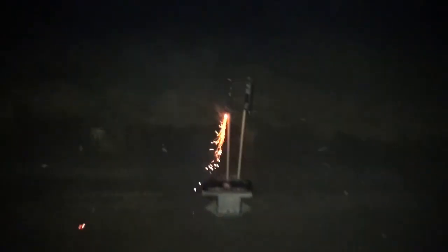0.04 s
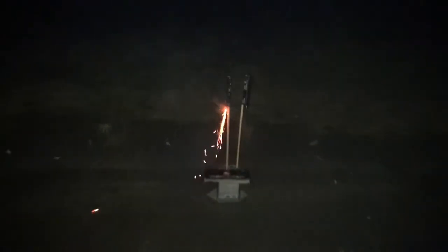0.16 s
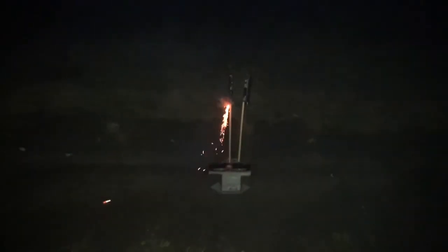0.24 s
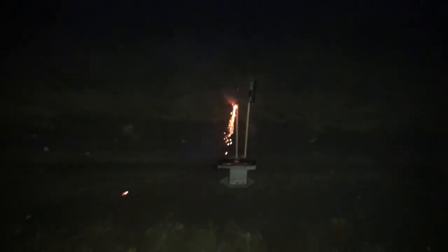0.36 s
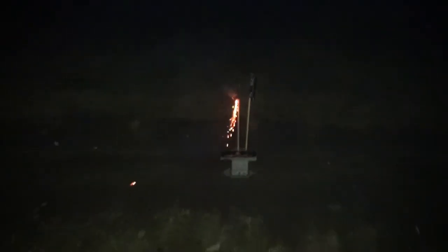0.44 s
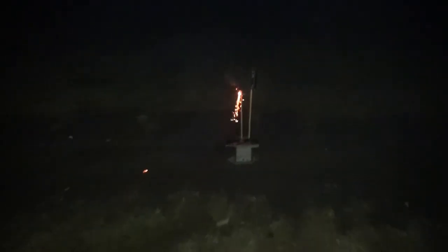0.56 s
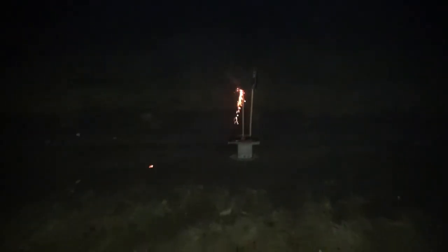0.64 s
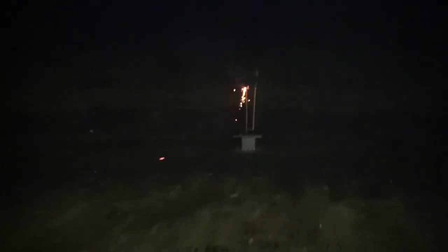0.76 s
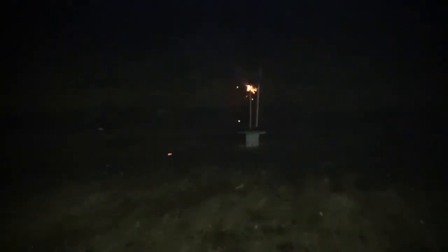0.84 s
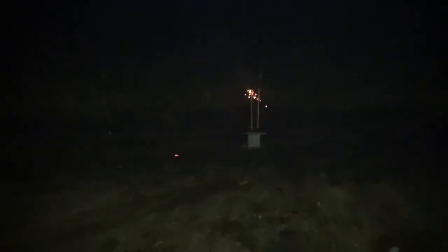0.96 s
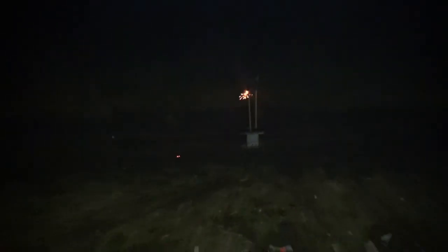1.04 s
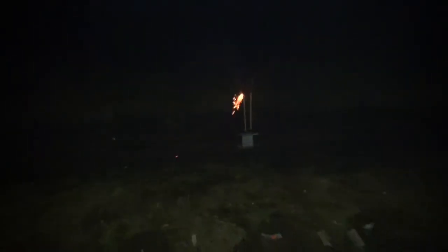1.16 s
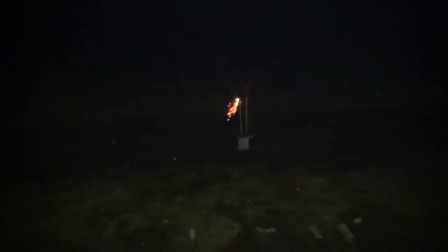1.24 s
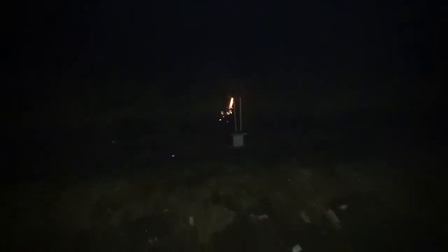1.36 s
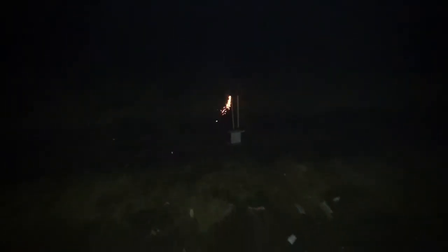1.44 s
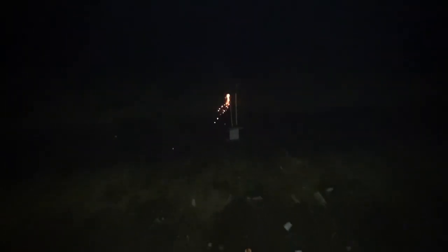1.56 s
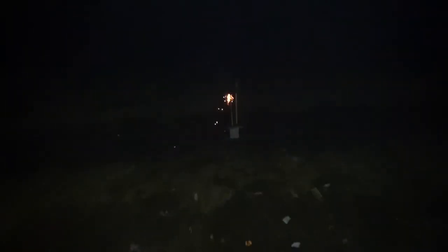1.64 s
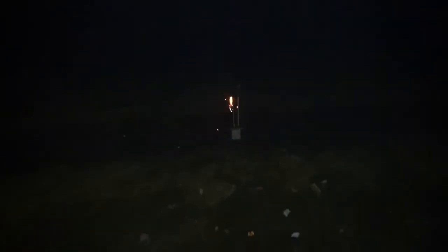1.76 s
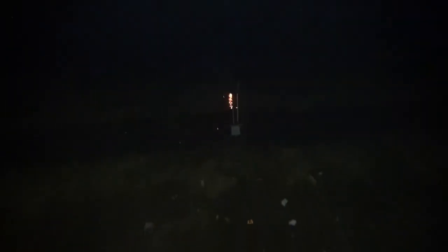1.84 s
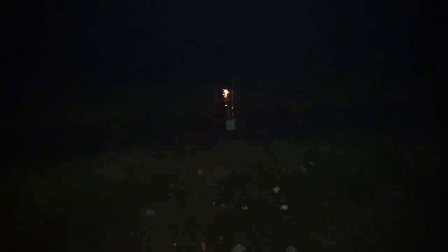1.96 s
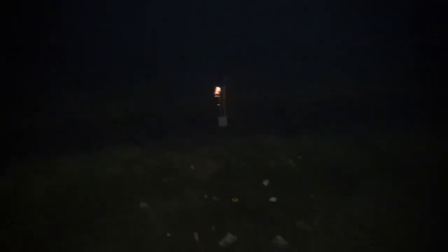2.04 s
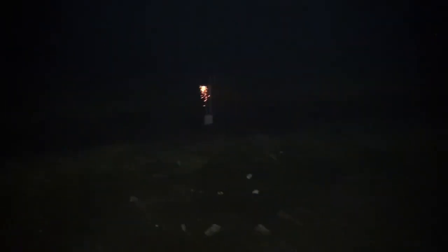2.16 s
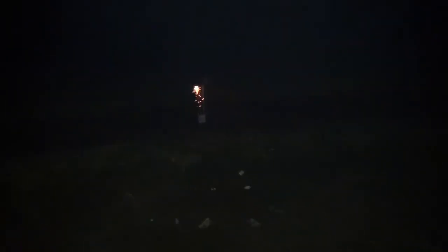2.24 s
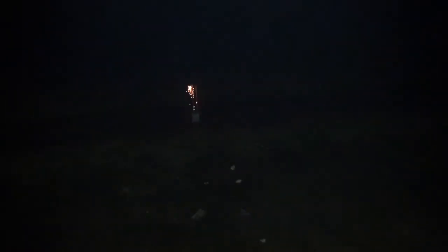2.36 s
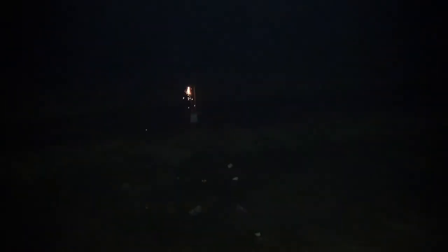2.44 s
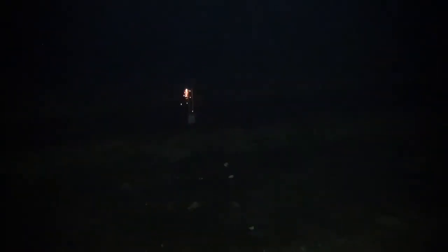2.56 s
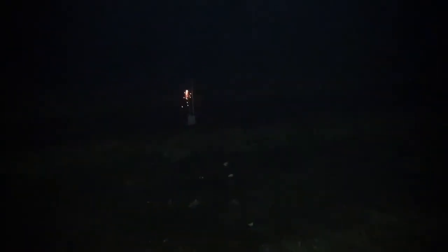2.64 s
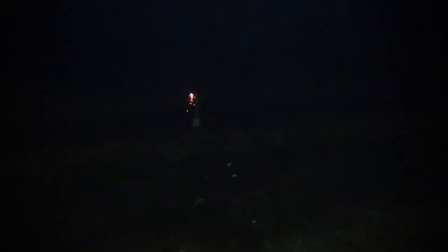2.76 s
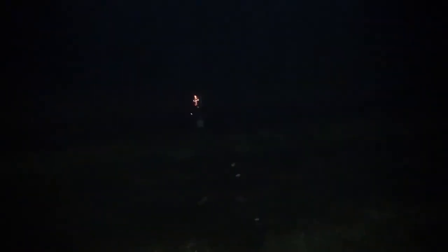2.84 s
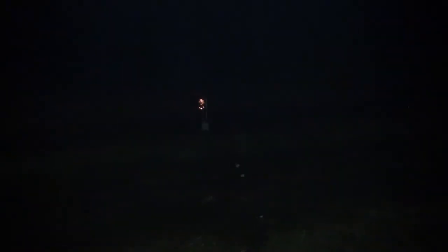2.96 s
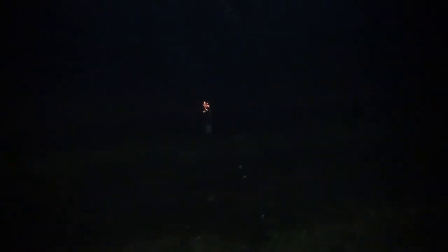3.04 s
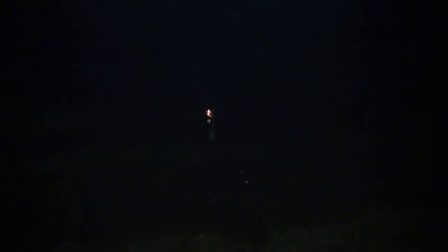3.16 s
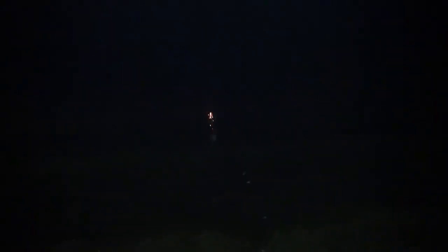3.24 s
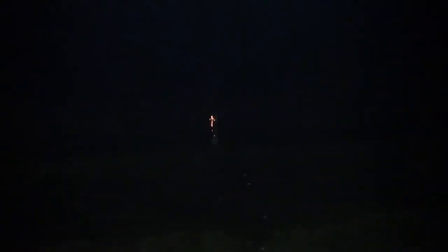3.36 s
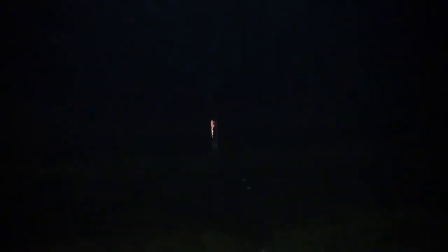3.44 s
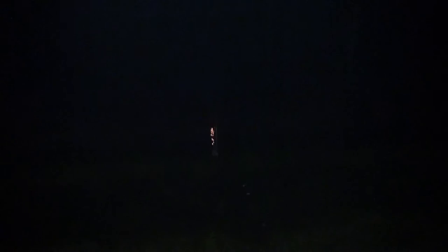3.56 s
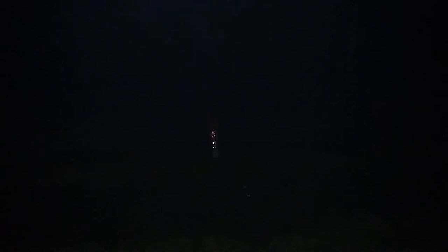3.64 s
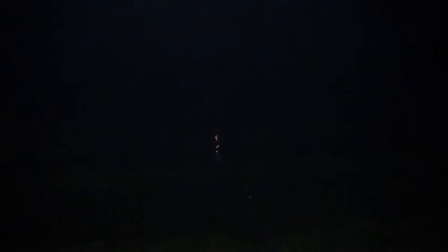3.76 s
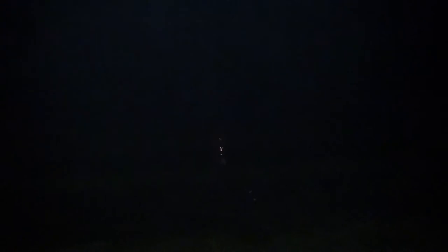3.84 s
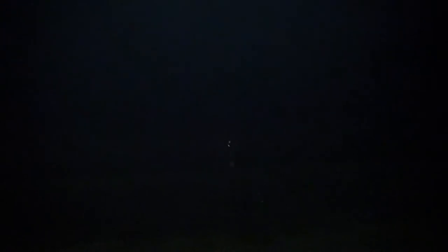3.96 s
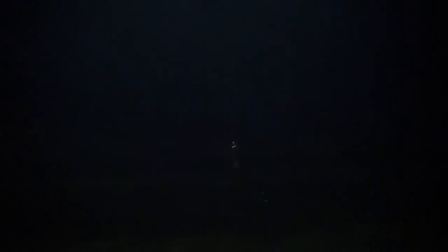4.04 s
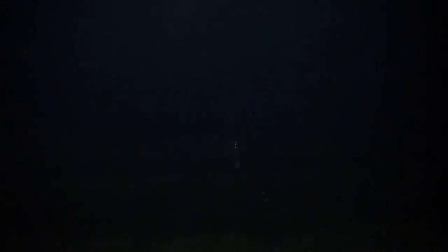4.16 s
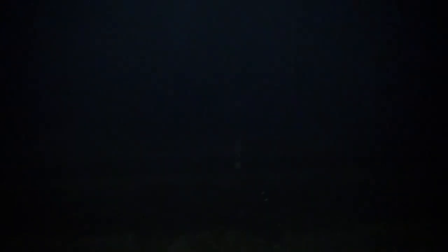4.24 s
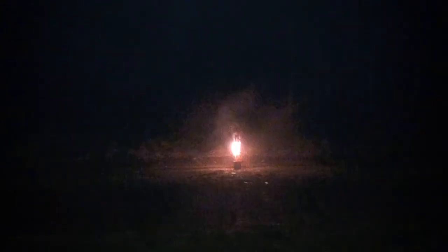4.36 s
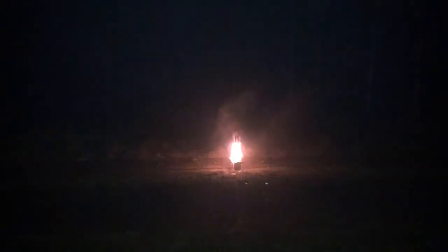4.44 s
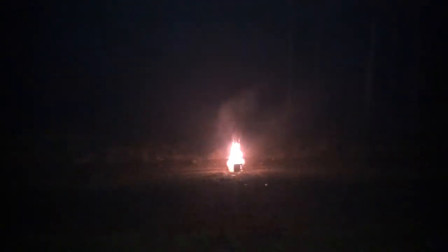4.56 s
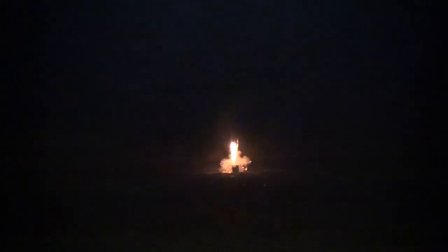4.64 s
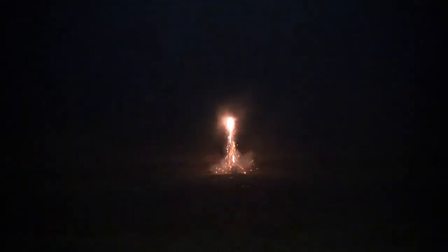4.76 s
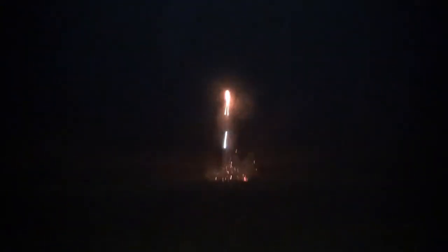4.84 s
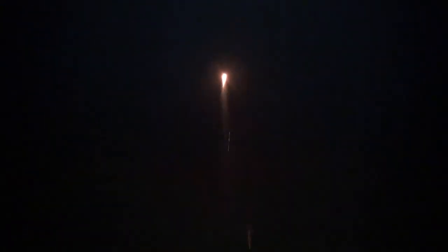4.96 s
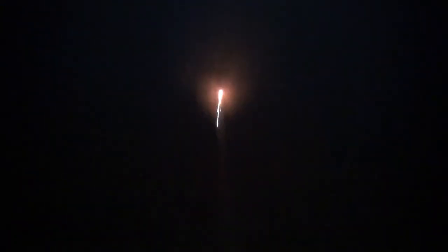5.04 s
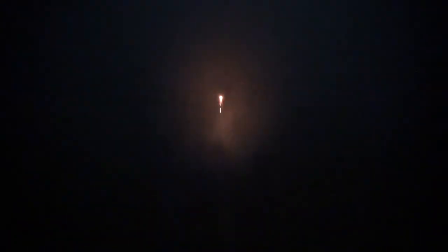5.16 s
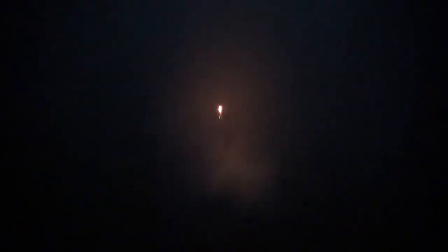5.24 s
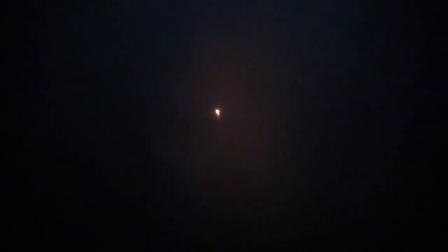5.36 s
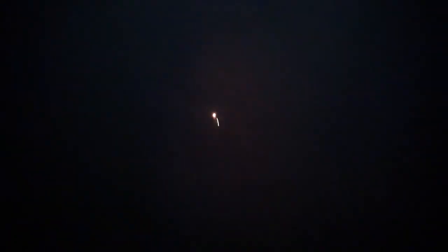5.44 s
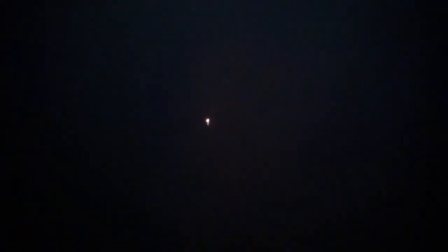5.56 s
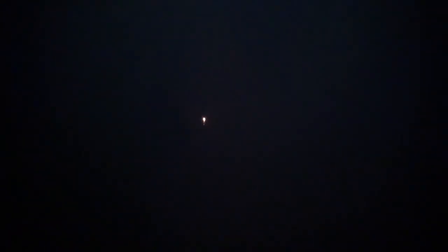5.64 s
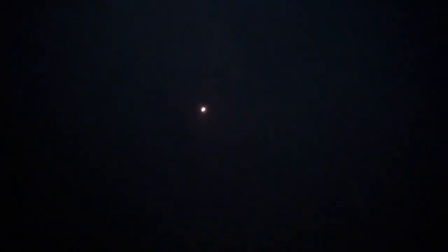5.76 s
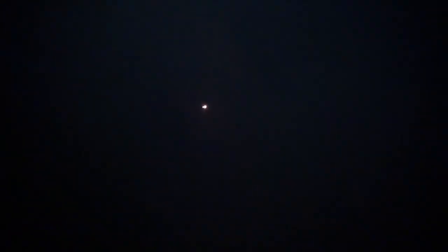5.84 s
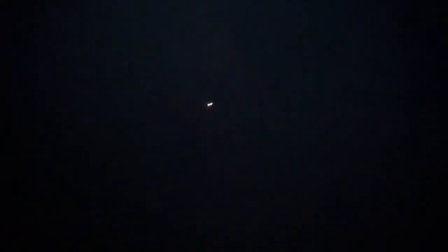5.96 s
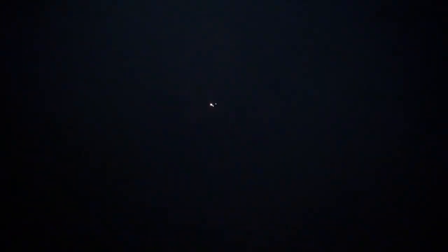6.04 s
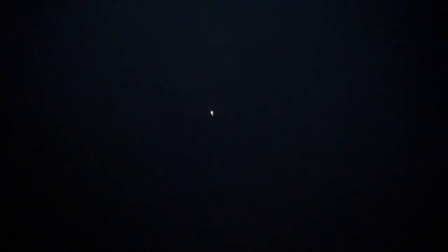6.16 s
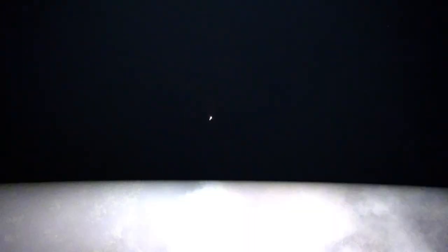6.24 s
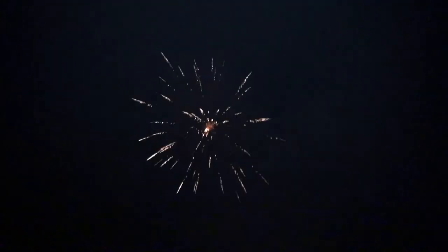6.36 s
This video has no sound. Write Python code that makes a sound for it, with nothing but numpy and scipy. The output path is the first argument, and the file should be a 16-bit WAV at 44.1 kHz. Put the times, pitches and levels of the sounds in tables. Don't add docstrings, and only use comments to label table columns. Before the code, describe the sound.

Open field at night, hand-held microphone. A fluttering fuse fizz grows fainter as the holder backs away with dull thuds, grass swish, cloth rub and wind buffeting. After a near-silent lull the motor hisses, then abruptly screams: a very loud, bright, buzzy whistle with rushing exhaust, sliding steadily lower and fading as it climbs, with diffuse echoes behind. No bang is heard.

```python
import sys
import numpy as np
from scipy import signal
from scipy.fft import rfft, irfft
from scipy.io import wavfile
from scipy.ndimage import map_coordinates

SR = 44100
rng = np.random.default_rng(int(sys.argv[2]) if len(sys.argv) > 2 else 0)


def to_wav(sig):
    pcm = np.clip(np.atleast_2d(sig), -1, 1) * 32767
    pcm = np.round(pcm).astype(np.int16)
    wavfile.write(sys.argv[1], SR, pcm.T)


def attenuation_scalar(level_db):
    decades = np.asarray(level_db, float) / 20
    return 10 ** decades


N = 282240
TIME = np.arange(N) / SR
PUFF_T = np.arange(8192) / SR
CATCH_S = 4.69

# [t/s, level/dB]
GROUND = [(.6, -14), (1.1, -3), (4.3, -7), (5.1, -5.5), (5.14, -13), (5.4, -16), (5.7, -30)]


def unit(x):
    return x / np.sqrt(np.mean(x ** 2) + 1e-20)


def along(points, hz):
    f, v = np.transpose(points)
    return np.interp(np.log(hz + 1), np.log(f + 1), v)


def curves(rows):
    s, *cols = np.transpose(rows)
    return [np.interp(TIME, s, c) for c in cols]


def since(s):
    return np.clip(TIME - s, 0, None)


def until(s):
    return np.clip(s - TIME, 0, None)


def wobble(rate_hz):
    knots = rng.standard_normal(int(N * rate_hz / SR) + 4)
    return unit(map_coordinates(knots, [TIME * rate_hz], prefilter=False))


def hiss(spectrum, alike):
    gain = attenuation_scalar(along(spectrum, np.fft.rfftfreq(N, 1 / SR)))
    a, b = irfft(rfft(rng.standard_normal((2, N))) * gain, N)
    turn = np.arccos(alike) / 2
    mid, side = np.cos(turn) * a, np.sin(turn) * b
    return unit(np.array([mid + side, mid - side]))


def panned(x, pan_db):
    return x * attenuation_scalar(np.array([[pan_db / 2], [-pan_db / 2]]))


def low_pass(x, hz):
    return signal.sosfiltfilt(signal.butter(2, hz, fs=SR, output="sos"), x)


def night():
    # [f/Hz, level/dB]
    hum = [(100, -13), (300, -15), (700, 0), (1200, -3.5), (3000, -9.5), (8000, -9.5), (15000, -34)]
    return panned(attenuation_scalar(-69.0) * hiss(hum, alike=.6), pan_db=-4.0)


def walking():
    # [t/s, level/dB]
    walk = [(0, -5), (.12, 3), (.33, -5.5), (.37, -4), (.55, -4.5), (.75, -8), (.86, -8.5), (1, -9),
            (1.35, -6.5), (1.48, -9), (1.57, -7.5), (2.2, -21), (2.3, -10.5), (3.04, -28), (3.4, -10),
            (3.8, -29), (4.1, -22), (4.3, -24)]
    # [t/s, level/dB]
    breeze = [(0, -45.5), (.2, -46.5), (.35, -45), (.5, -47.5), (.8, -48), (1.1, -46), (1.6, -54.5),
              (2.2, -57.5), (3, -56), (3.7, -58), (4.4, -55.5)]
    # [f/Hz, level/dB]
    grass_colour = [(880, -32), (1500, -6), (3540, -6.5), (7880, -4), (10400, -9), (13100, -4),
                    (15400, -30)]
    # [f/Hz, level/dB]
    cloth_colour = [(88, -22), (150, 3), (270, -9), (319, -7), (481, -7), (1220, -3.5), (2500, -21),
                    (3250, -30), (5500, -120)]
    # [f/Hz, level/dB]
    buffet_colour = [(4.7, -15), (8.0, 13), (32, 8), (129, -23.5), (165, -25.5), (275, -25.5), (323, -23),
                     (400, -28), (520, -32), (880, -120)]
    (bustle_db,), (breeze_db,) = curves(walk), curves(breeze)
    grass = attenuation_scalar(-56.5 + 0.97 * bustle_db + 1.4 * wobble(510)) * hiss(grass_colour, alike=0.37)
    cloth = attenuation_scalar(-62 + bustle_db + 3.6 * wobble(40)) * hiss(cloth_colour, alike=0.76)
    lumps = attenuation_scalar(2.9 * np.array([wobble(11), wobble(6.1)]))
    gusts = unit(lumps * hiss(buffet_colour, alike=0.021))
    buffet = attenuation_scalar(breeze_db + 3.0 - 3.2 * since(3.4)) * gusts
    return panned(grass + cloth, pan_db=-6.0) + panned(buffet, pan_db=-8.0)


def puff(hz, spread, length_s, pan_db):
    shared, own = rng.standard_normal(len(PUFF_T)), rng.standard_normal((2, len(PUFF_T)))
    edges_hz = [hz / spread, min(hz * spread, .35 * SR)]
    band = signal.butter(2, edges_hz, "bandpass", fs=SR, output="sos")
    swell = np.sin(np.pi * np.clip(PUFF_T / length_s, 0, 1)) ** 2
    return panned(unit(signal.sosfilt(band, shared + own)) * swell, pan_db)


def knock(hz, db, creak_db):
    thud = np.sin(2 * np.pi * hz * PUFF_T)
    creak = attenuation_scalar(creak_db + 1.5) * np.sin(2 * np.pi * 315 * PUFF_T)
    t60_s, rise_s = 0.065, 0.0069
    return (thud + creak) * attenuation_scalar(db - 60 * PUFF_T / t60_s) * (1 - np.exp(-PUFF_T / rise_s))


def steps():
    # [t/s, level/dB, f/Hz, length/s, left-right/dB]
    groans = [
        (.141, -59.5, 315, .11, -19),
        (.147, -58, 205, 0.12, -13),
        (.501, -59.5, 320, .08, -15),
    ]
    # [t/s, level/dB, f/Hz, length/s, left-right/dB]
    scuffs = [(.129, -52, 1060, .02, -4), (.183, -52, 980, 0.022, -5), (.213, -44, 1600, 0.012, -1),
              (.371, -45, 1150, 0.016, -5), (.637, -57.5, 9300, 0.13, -12), (.721, -62, 520, .021, -4),
              (.836, -54, 3500, .002, -11), (1.05, -56, 730, 0.019, -6), (1.313, -54, 1230, .008, 0),
              (1.455, -65, 3900, .008, 2), (1.623, -55, 960, 0.009, 3), (1.708, -60, 298, 0.017, 9),
              (2.35, -64, 4800, .03, 0), (3.418, -56, 800, 0.0054, -5), (3.513, -69, 1700, .006, -6),
              (3.56, -62, 9000, .008, -6), (4.101, -64, 1100, 0.011, -7)]
    # [t/s, level/dB, f/Hz, length/s, left-right/dB]
    snaps = [
        (.54, -48.5, 10000, 0.006, -16),
        (.858, -50, 1560, 0.036, -11),
        (1.004, -47, 3500, 0.011, -9),
        (1.71, -53.5, 1500, 0.0093, 11),
        (2.302, -57, 3300, 0.0065, 2),
        (3.385, -67, 2700, 0.036, -13),
    ]
    # [t/s, level/dB, f/Hz, creak/dB, soil/dB]
    thuds = [(.022, -40, 114, -4, -66), (0.09, -32.5, 84, -14, -72), (.269, -43, 120, -15, -63),
             (0.5, -46, 133, -12, -67), (0.653, -29, 117, -20, -55.5), (.967, -50, 81, -2, -55.5),
             (1.074, -41.5, 81, -3, -62), (1.53, -42, 89, -27, -78), (1.968, -60, 81, -20, -69),
             (2.179, -42, 79.4, -10, -71), (2.436, -51.5, 127, -18, -71), (2.694, -46, 81, -14, -68),
             (4.118, -45, 110, -29.5, -67)]
    out = np.zeros((2, N + SR))
    for rows, spread in (groans, 1.06), (scuffs, 1.45), (snaps, 3.8):
        for s, db, hz, length_s, pan_db in rows:
            start = round((s - length_s / 2) * SR)
            out[:, start:start + len(PUFF_T)] += attenuation_scalar(db) * puff(hz, spread, length_s, pan_db)
    for s, db, hz, creak_db, soil_db in thuds:
        start = round(s * SR)
        soil = attenuation_scalar(soil_db) * puff(236, spread=1.6, length_s=0.046, pan_db=-11.5)
        out[:, start:start + len(PUFF_T)] += panned(knock(hz, db, creak_db)[None], pan_db=-7) + soil
    return out[:, :N]


def hedges(x):
    # [f/Hz, t60/s]
    decay = [(300, 7.8), (2000, 1.78), (5000, 1.04), (12000, 1.1)]
    # [f/Hz, level/dB]
    echo_colour = [(2000, 4), (4000, 3), (8000, 6.5), (11000, 9), (14000, 10)]
    hz, t, z = signal.stft(rng.standard_normal((2, 3 * SR // 2)), SR, nperseg=256)
    onset = 1 - np.exp(-t / 0.055)
    level_db = along(echo_colour, hz)[:, None] - 60 * t / along(decay, hz)[:, None]
    tail = signal.istft(z * onset * attenuation_scalar(level_db), SR, nperseg=256)[1]
    tail = tail + .5 * tail[::-1]
    return signal.fftconvolve(x[None], tail / np.linalg.norm(tail[0]), axes=1)[:, :N]


def pitch():
    # [t/s, f/Hz]
    note = [(4.7, 3127), (4.79, 2751), (4.86, 2697), (4.95, 2540), (5.06, 2475), (5.12, 2497), (5.3, 2349),
            (5.86, 2028), (6.4, 1859)]
    settle_s = .006
    turn_s = CATCH_S - settle_s
    overshoot_hz = 680 * np.exp(-(since(turn_s) / settle_s) ** 2)
    return curves(note)[0] + overshoot_hz - 4000 * until(turn_s)


def lag():
    # [t/s, distance/m]
    retreat = [(0, 2.7), (1.5, 5.02), (2.4, 6.95), (4.3, 9.02)]
    # [t/s, lag/whistle periods]
    climb = [(4.69, 1.33), (4.82, 1.65), (4.883, 2.5), (4.933, 3.5), (5.03, 6.05), (5.103, 8.5),
             (5.24, 13.5), (6.4, 40)]
    fuse_m, ear_m, sound_m_per_s = .5, 1.3, 343
    standing_s = 2 * fuse_m * ear_m / curves(retreat)[0] / sound_m_per_s
    return np.where(TIME < climb[0][0], standing_s, curves(climb)[0] / pitch())


def off_ground(x):
    earlier = np.arange(N) - lag() * SR
    late = np.array([map_coordinates(side, [earlier], mode="nearest") for side in low_pass(x, hz=11100)])
    return x + attenuation_scalar(curves(GROUND)[0]) * late


def far(x):
    share = np.clip(since(4.8) / 1.4, 0, 1)
    return (1 - share) * x + share * low_pass(x, hz=11200)


def fuse():
    # [t/s, level/dB]
    burn_level = [(0, -53.5), (.36, -59), (.85, -66.5), (1.42, -62.5), (2.2, -66), (3.02, -71), (3.4, -72),
                  (4.38, -70), (4.45, -62)]
    # [f/Hz, level/dB]
    fuse_colour = [(400, -15), (800, -14), (1500, 0), (2500, -3), (4000, -2), (6000, -3.5), (9000, -2.5),
                   (12000, -8), (15500, -4)]
    # [f/Hz, level/dB]
    mouth = [(1100, -34), (1700, -10), (2150, -5.5), (2550, -12.5), (3000, -28)]
    fizz_db, = curves(burn_level)
    flare_s = 4.21
    flare_db = 46 * np.minimum(since(flare_s), .2) - 200 * np.minimum(since(4.39), .06)
    ring_db = -23 + 6 * TIME + flare_db
    spit = attenuation_scalar(fizz_db + 2.1 * wobble(8.2) + 1.9 * wobble(500) - 110 * since(4.4))
    fizz = attenuation_scalar(-0.5 - 90 * since(flare_s)) * hiss(fuse_colour, alike=0.73)
    ring = attenuation_scalar(ring_db) * hiss(mouth, alike=0.98)
    return panned(spit * (fizz + ring), pan_db=-7.5)


def jet():
    # [t/s, level/dB]
    thrust = [(4.25, -87), (4.42, -68.5), (4.48, -64.5), (4.67, -53), (4.69, -40.5), (4.88, -38.5),
              (5.48, -39.5), (5.62, -41.5), (6.4, -50)]
    # [f/Hz, level/dB]
    roar_colour = [(150, -16), (500, -5.5), (1000, -1), (2000, 4), (3500, -6.5), (6000, -5.5)]
    # [f/Hz, level/dB]
    sizzle_colour = [(2500, -27), (4500, 3), (6000, 0), (8000, 7), (10500, -15), (13000, -10),
                     (16000, -2.5)]
    # [f/Hz, level/dB]
    rumble_colour = [(20, 8.5), (100, -2.5), (300, -3.5), (600, -5.5), (1200, -20)]
    lift_s, spent_s = 4.58, 5.32
    thrust_db, = curves(thrust)
    blast_db = np.clip(28 - 66 * since(lift_s) - 80 * until(lift_s - .05), 0, None)
    choked_db = -8 * np.minimum(until(CATCH_S + 0.08) / .1, 1)
    spent_db = -7.5 * np.minimum(since(spent_s) / 0.044, 1)
    sizzle_db = 15 - since(lift_s + 0.37) + choked_db + spent_db
    lit = attenuation_scalar(thrust_db - 90 * until(4.3) + 0.86 * wobble(45) + 0.8 * wobble(400))
    roar = attenuation_scalar(8.5) * hiss(roar_colour, alike=0.78)
    sizzle = attenuation_scalar(sizzle_db - 260 * until(4.46)) * hiss(sizzle_colour, alike=0.24)
    in_tube = low_pass(low_pass(sizzle, hz=10500), hz=10500)
    sizzle = np.where(TIME < CATCH_S, in_tube, sizzle)
    rumble = attenuation_scalar(-17.5 + blast_db) * hiss(rumble_colour, alike=0.8)
    return panned(lit * (roar + sizzle + rumble), pan_db=-7.5)


def whistle():
    # [t/s, tone/dB, dulling of the overtones/dB]
    sung = [(4.7, -4.5, 6), (4.82, -8, -4.5), (5.0, -7, 1.5), (5.3, -8, 17), (5.6, -12.5, 13),
            (5.8, -17, 16), (6.1, -21.5, 13), (6.3, -25.5, 11.5), (6.4, -26, 9)]
    # [order, level over the tone/dB, share of the dulling, loss/(dB/s)]
    partials = [(1, 0, 0, 0), (2, -6, .25, 6), (3, -11, 1.1, 0.1), (4, -16, .75, 0.1), (5, -20, .7, 4),
                (6, -26, .6, 5), (7, -30, .5, 3), (8, -34, .5, 3)]
    (tone_db, dull_db), note_hz = curves(sung), pitch()
    wait_s = until(CATCH_S)
    rise_db = np.maximum(5 - 4100 * wait_s, -26.5 - 350 * wait_s)
    unrest = attenuation_scalar(-9 * np.clip(TIME - 5.2, 0, 1))
    turns = np.cumsum(note_hz + unrest * (9 * wobble(250) + 5 * wobble(50))) / SR
    late_turns = np.interp(TIME - lag(), TIME, turns)
    ground = attenuation_scalar(curves(GROUND)[0])
    smear = attenuation_scalar(-28 + 6 * (TIME - sung[0][0]))
    tone = np.zeros(N)
    for order, db, share, loss_db_per_s in partials:
        lead, bounce = (0.15 / (order - 1), 0.41) if order > 1 else (0, 0)
        steep_db = 0.22 * (order - 1) * np.minimum(rise_db, 0)
        level_db = tone_db + db - share * dull_db - loss_db_per_s * since(CATCH_S) + rise_db + steep_db
        size = attenuation_scalar(level_db) * (order * note_hz < SR / 2)
        angle = 2 * np.pi * (order * turns + lead)
        late_angle = 2 * np.pi * (order * late_turns + lead + bounce)
        blur = 2.2 * smear * (order - .9) ** .9
        in_phase, across = 1 + blur * wobble(200 * order), blur * wobble(200 * order)
        direct = in_phase * np.cos(angle) + across * np.sin(angle)
        tone += np.sqrt(2) * size * (direct + ground * np.cos(late_angle))
    breath_db = np.maximum(-24 - 1800 * wait_s, -56.5 - 237 * until(4.45))
    fading = unrest * attenuation_scalar(breath_db + tone_db - tone_db[0])
    angle = 2 * np.pi * turns
    breath = wobble(1100) * np.cos(angle) + wobble(1100) * np.sin(angle)
    return tone + fading * breath


def scene():
    note = whistle()
    rocket = panned(attenuation_scalar(-1.4) * note, pan_db=-9) + panned(attenuation_scalar(-13.5) * hedges(note), pan_db=-8.0)
    return night() + walking() + steps() + far(rocket + off_ground(fuse() + jet()))


def band_limit(x):
    return signal.sosfilt(signal.butter(12, 15590, fs=SR, output="sos"), x)


def record(dry):
    top = np.where(dry > 0, .96, 1.01)
    flat = dry / (1 + np.abs(dry / top) ** 12) ** (1 / 12)
    shaved = flat - dry
    mix = flat - 0.53 * (low_pass(shaved, hz=110) - low_pass(shaved, hz=11))
    return band_limit(mix)


dry = scene()
out = record(dry)
to_wav(out)
```